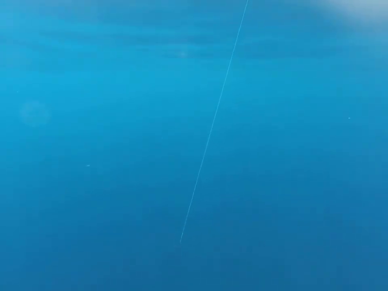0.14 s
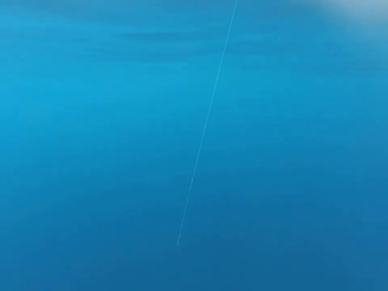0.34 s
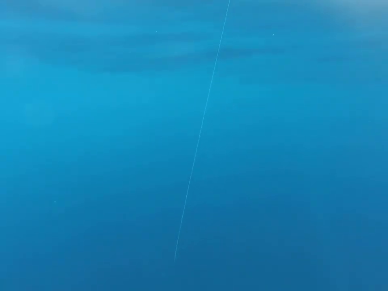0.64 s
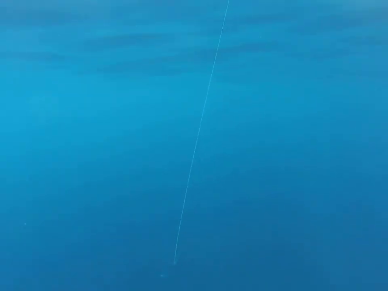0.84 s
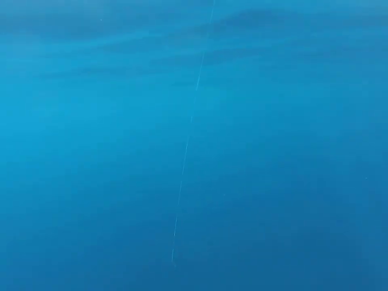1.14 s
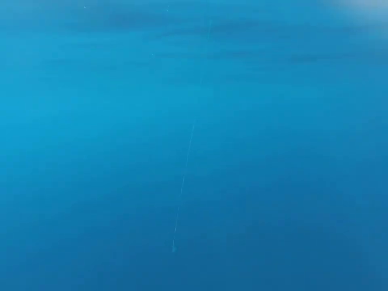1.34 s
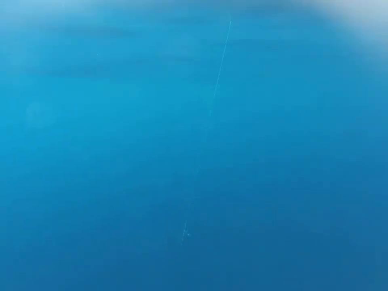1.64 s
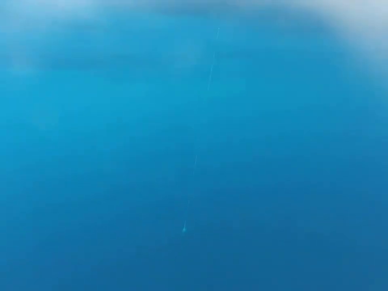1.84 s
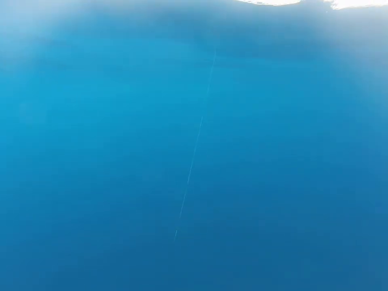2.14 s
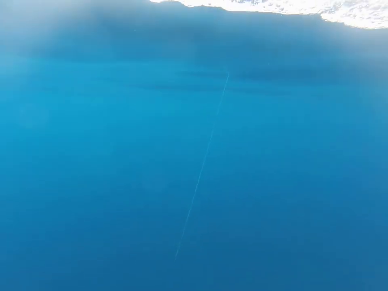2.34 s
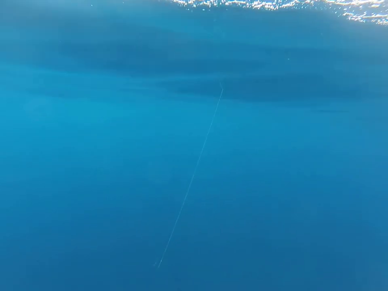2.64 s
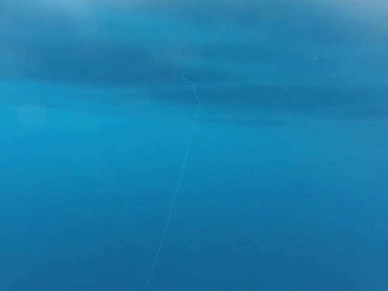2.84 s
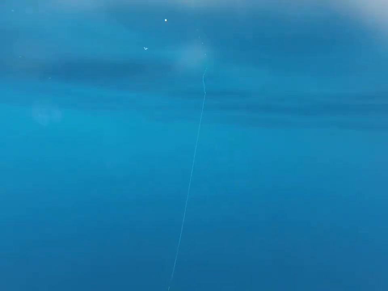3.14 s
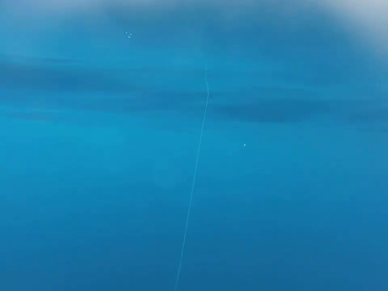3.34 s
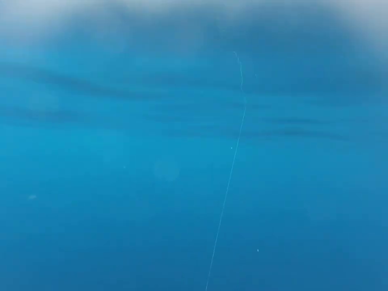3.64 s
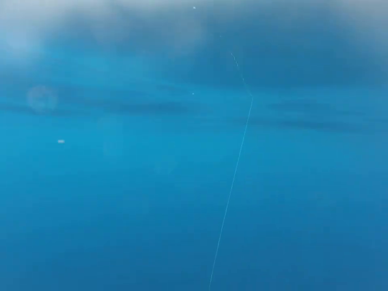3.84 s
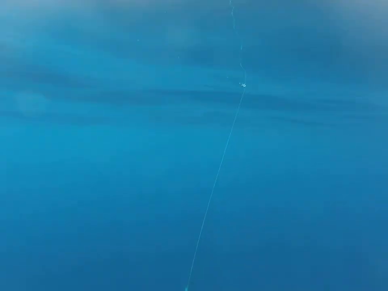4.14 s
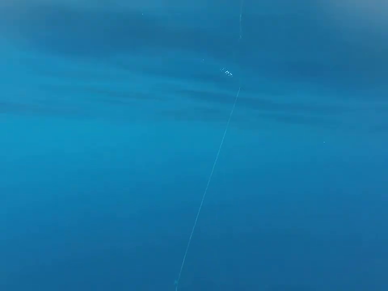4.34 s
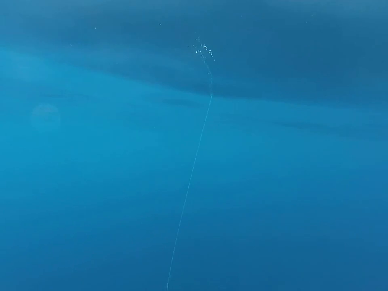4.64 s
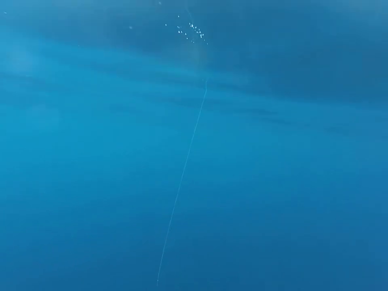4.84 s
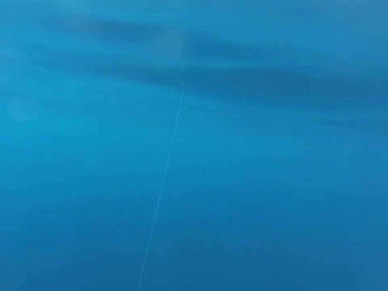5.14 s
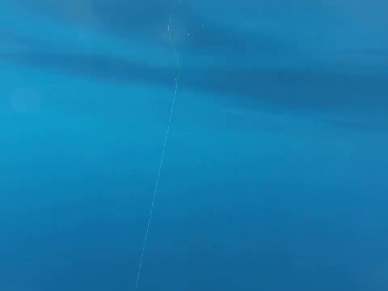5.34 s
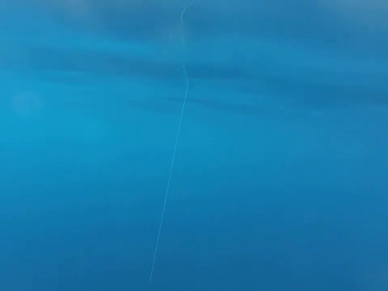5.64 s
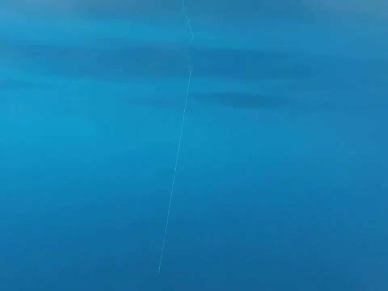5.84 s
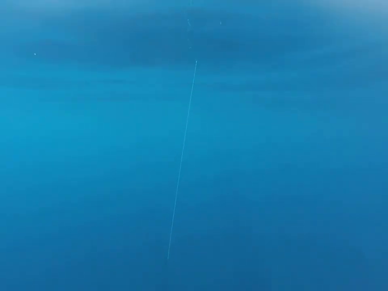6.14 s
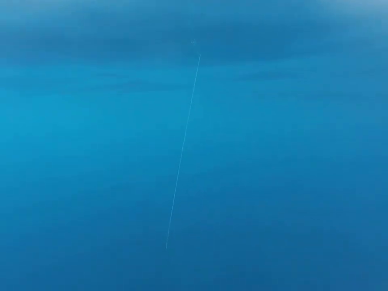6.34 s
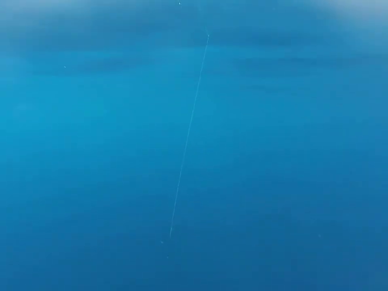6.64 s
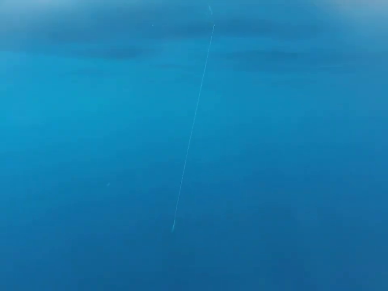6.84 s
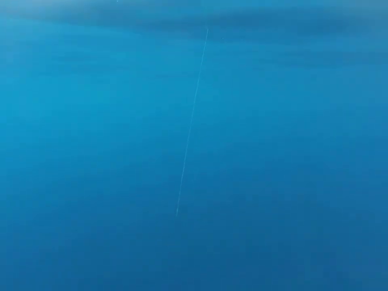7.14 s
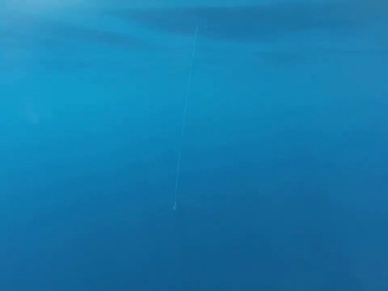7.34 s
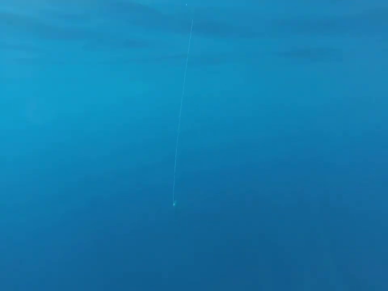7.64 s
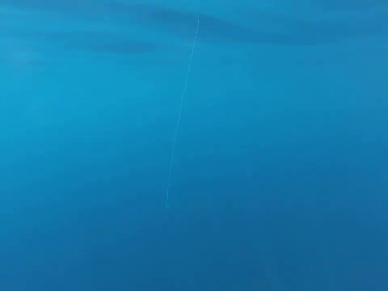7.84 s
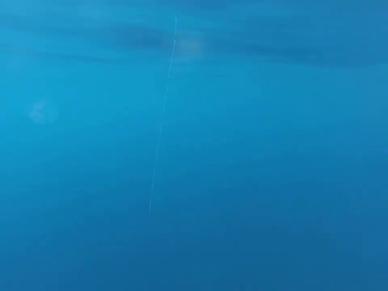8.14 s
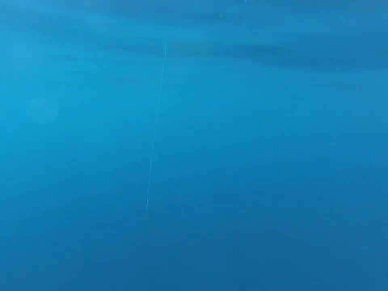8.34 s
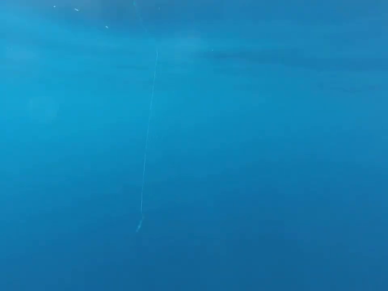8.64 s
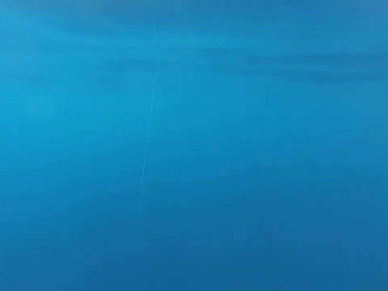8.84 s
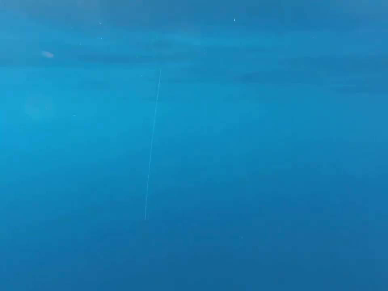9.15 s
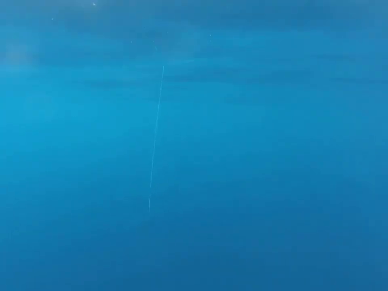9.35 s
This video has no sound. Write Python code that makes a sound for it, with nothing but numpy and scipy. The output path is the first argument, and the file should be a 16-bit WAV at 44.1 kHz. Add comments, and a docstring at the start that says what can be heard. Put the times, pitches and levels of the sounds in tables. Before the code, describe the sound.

Just under the sea, a quiet boat-hull hum and fast ticking give way at two seconds to a harsh, bubbling propeller roar.

```python
"""A hull drones and an engine knocks twelve times a second, heard in a waterproof housing just under the sea.
Shaken resonances and a singing tone make the drone; flow noise, decaying pulsations and struck modes make
the water that buffets and taps the housing. At two seconds the propeller wash arrives: random clicks,
as of collapsing bubbles, make the housing whine, crackle and fizz, and the recorder's limiter pumps.
Late on, a plume of bubbles gurgles and chirps past."""
import sys
import numpy as np
from scipy import signal
from scipy.fft import rfft, irfft
from scipy.io import wavfile

SR = 44100
rng = np.random.default_rng(int(sys.argv[2]) if len(sys.argv) > 2 else 0)


def materialize(psi):
    """Save the field psi as 16-bit PCM at rate SR to the path in sys.argv[1].

    A 1-D psi becomes a single channel; in a 2-D psi each row is a channel.
    """
    bounded = np.clip(np.atleast_2d(psi).T, -1, 1)
    quanta = np.round(bounded * 32767).astype(np.int16)
    wavfile.write(sys.argv[1], SR, quanta)


N = 418509
TIME = np.arange(N) / SR
FFT_SIZE = 16384
FREQS = np.arange(FFT_SIZE // 2 + 1) * SR / FFT_SIZE

ENGINE_HZ = 12.08  # engine cycles per second
WASH_START_S, WASH_RISE_S = 1.968, 0.033
# spectrum of fluttering water: (frequency [Hz], relative level [dB])
FLUTTER_SPECTRUM = [(35, -18.5), (55, -7), (75, 0.5), (100, -0.5), (150, -4), (230, -12.5), (500, -40.5)]


def from_db(db):
    """Amplitude ratio of a level: 20 dB is a factor of ten."""
    return 10 ** (np.asarray(db) / 20)


def rms_one(x):
    """Normalization by the root mean square, the measure of a signal's power."""
    return x / np.sqrt(np.mean(x ** 2) + 1e-20)


def in_time(rows):
    """Linear interpolation of each column of a table whose first column is time [s]."""
    s, *columns = np.transpose(rows)
    return [np.interp(TIME, s, c) for c in columns]


def drift(rate):
    """Low-passed noise: white noise through a double pole at rate [Hz] wanders smoothly, with rms 1."""
    step = 20  # computed at every 20th sample
    settling = 2000
    pole = np.exp(-2 * np.pi * rate * step / SR)
    noise = rng.standard_normal(N // step + 2 + settling)
    slow = signal.lfilter([1], [1, -2 * pole, pole * pole], noise)[settling:]
    return np.interp(np.arange(N) / step, np.arange(len(slow)), rms_one(slow))


def swell(s, length_s):
    """Raised-cosine envelope: a smooth rise to 1 at time s and back, length_s wide at half height."""
    return np.cos(np.pi / 2 * np.clip((TIME - s) / length_s, -1, 1)) ** 2


def response(gain):
    """Minimum phase: folding the cepstrum of a gain at FREQS yields its causal impulse response."""
    cepstrum = irfft(np.log(gain + 1e-7))
    cepstrum[1:FFT_SIZE // 2] *= 2
    cepstrum[FFT_SIZE // 2 + 1:] = 0
    return irfft(np.exp(rfft(cepstrum)))[:FFT_SIZE // 2]


def body(modes):
    """Modal superposition: the powers of steep-sided resonances add up to one impulse response."""
    power = 0
    for hz, width, db in modes:
        detuning = (FREQS - hz) / width
        power = power + from_db(db) ** 2 / (1 + detuning ** 2 / 2) ** 6
    return response(np.sqrt(power))


def colour(points):
    """Spectral shaping: a smooth response through the points that falls away towards and above the last."""
    hz, db = np.transpose(points)
    gain = from_db(np.interp(np.log(FREQS + 1), np.log(hz), db))
    return response(gain / (1 + (FREQS / hz[-1]) ** 2))


def excite(force, impulse):
    """Linear response: convolving a steady force with an impulse response, scaled to rms 1."""
    return rms_one(signal.oaconvolve(force, impulse)[:N])


def add(out, s, sound):
    """Superposition: a short sound adds to the others from time s."""
    start = max(round(s * SR), 0)
    out[start:start + len(sound)] += sound[:max(N - start, 0)]


def strikes(events, impulse, rattle, contact_s):
    """Impulse excitation: a click and a decaying rattle ring a body, peaking at the event's time and level."""
    out, t = np.zeros(N), TIME[:FFT_SIZE // 8]
    for s, db in events:
        force = rng.standard_normal(len(t)) * np.exp(-t / contact_s)
        force *= rattle / np.linalg.norm(force)
        force[0] += 1  # the click
        sound = signal.fftconvolve(force, impulse)
        size = np.abs(sound)
        add(out, s - np.argmax(size) / SR, from_db(db) * sound / size.max())
    return out


def random_clicks(per_s, size_db):
    """Shot noise: independent clicks of either sign and uneven size at random moments."""
    sizes = from_db(size_db * np.minimum(rng.exponential(1, N), 4))
    signs = rng.choice([-1, 1], N)
    return sizes * signs * (rng.random(N) < per_s / SR)


def throb(depth_db):
    """Amplitude modulation at the engine rate and its next three harmonics, each depth_db deep."""
    cycles = ENGINE_HZ * TIME + 0.2 * drift(0.33)
    return from_db(depth_db * sum(np.cos(2 * np.pi * (k * cycles + rng.random())) for k in range(1, 5)))


def pulsation(db, hz, cycles, rise):
    """Volume oscillation of a pocket of air or water: a gliding sine that falls 60 dB in the given cycles."""
    age = TIME[:SR // 3] * hz / cycles  # 1 when 60 dB down
    onset = 1 - np.exp(-age / 0.085)
    phase = 2 * np.pi * cycles * (age + rise * age ** 2)
    swing = np.sin(phase) * onset * from_db(-60 * age)
    return from_db(db) * swing / np.abs(swing).max()


def hull_drone(in_wash):
    """Forced resonance: engine shaking rings the hull beside a singing tone, until the wash covers both."""
    # level of the drone: (time [s], main resonances [dB], overtones [dB])
    drone_levels = [(0.0, -23.5, -38), (0.25, -29, -39.5), (0.45, -26, -34.5), (1.0, -21.5, -39.5),
                    (1.3, -22, -35), (1.95, -25, -38.5)]
    # singing tone: (time [s], frequency [Hz], share of the main power [0-1])
    singing = [(0, 606.5, 0.18), (.5, 602, 0.06), (.8, 599, 0.38), (1.1, 605, 0.46), (1.4, 602.5, 0.39),
               (1.95, 588.7, 0.62)]
    # main hull resonances: (frequency [Hz], width [Hz], relative level [dB])
    hull_modes = [(180, 184, -14), (460, 88, -13.5), (593, 59, -3), (615, 286, -16), (828, 140, -28),
                  (906, 40, -15)]
    # overtones of the hull: (frequency [Hz], width [Hz], relative level [dB])
    overtone_modes = [(1273, 96, -3), (1348, 49, 5), (1600, 101, -12), (1800, 150, -12), (2180, 240, -15),
                      (2530, 200, -22.5), (3247, 650, -33.5), (3867, 610, -42)]
    main_db, overtone_db = in_time(drone_levels)
    hz, share = in_time(singing)
    share = np.clip(share, 0, 1)
    shake = random_clicks(per_s=1400, size_db=3.5) * throb(depth_db=0.94)
    phase = 2 * np.pi * np.cumsum(hz + 5 * drift(15.4)) / SR
    tone = np.sqrt(2) * np.sin(phase) * from_db(1.7 * drift(15))
    main = np.sqrt(share) * tone + np.sqrt(1 - share) * excite(shake, body(hull_modes))
    overtones = excite(shake, body(overtone_modes))
    return (1 - in_wash) * (from_db(main_db) * main + from_db(overtone_db) * overtones)


def flow():
    """Turbulent pressure: eddies rumble and flutter on the housing, their power rising in each surge."""
    # spectrum of the rumble: (frequency [Hz], relative level [dB])
    rumble_spectrum = [(8, -2), (20, 1.5), (33, -2.5), (52, -0.5), (75, -16), (150, -43.5)]
    # surges of water: (time of peak [s], length [s], rumble [dB], flutter [dB])
    surges = [(0.25, 0.38, -28, -31), (0.883, 0.15, -21, -47), (1.15, 0.24, -24, -24.5),
              (1.55, 0.39, -22.5, -19.5), (1.93, 0.25, -18, -22.5), (2.397, 0.24, -18.5, -34),
              (4.25, 0.36, -39, -32), (5.3, 0.32, -30, -31.5), (6.58, 0.24, -29, -29),
              (7.2, 0.52, -50, -30), (7.72, 0.18, -30, -37), (8.42, 0.55, -19.5, -30.5)]
    rumble_power, flutter_power = from_db(-31) ** 2, from_db(-47) ** 2  # steady flow
    for s, length, rumble_db, flutter_db in surges:
        surge = swell(s, length)
        rumble_power = rumble_power + surge * from_db(rumble_db) ** 2
        flutter_power = flutter_power + surge * from_db(flutter_db) ** 2
    rumble = np.sqrt(rumble_power) * excite(rng.standard_normal(N), colour(rumble_spectrum))
    eddies = random_clicks(per_s=150, size_db=2.5)
    flutter = np.sqrt(flutter_power) * excite(eddies, colour(FLUTTER_SPECTRUM))
    return rumble + flutter


def hiss():
    """Broadband noise: a faint steady random signal with a sloping spectrum."""
    # spectrum of the hiss: (frequency [Hz], relative level [dB])
    hiss_spectrum = [(500, -0.5), (4000, -1), (7000, -3.5), (10000, -6), (15000, -6)]
    return from_db(-63) * excite(rng.standard_normal(N), colour(hiss_spectrum))


def knocks():
    """Impact excitation once per engine cycle until the wash; each knock weights the modes afresh."""
    # what a knock rings with: (frequency [Hz], width [Hz], mean relative level [dB])
    knock_modes = [(1430, 90, 4.5), (1640, 130, -0.5), (1870, 240, -0.5), (2142, 100, 3.5), (2430, 100, -4),
                   (2522, 83, 3.5), (3300, 230, -15), (3930, 300, -19)]
    first_s, jitter_s = 0.04, 0.0015
    level_db, spread_db = -28, 4
    out = np.zeros(N)
    for s in np.arange(first_s, WASH_START_S, 1 / ENGINE_HZ):
        late, force, *luck = rng.standard_normal(len(knock_modes) + 2)
        modes = [(hz, width, db + 3.3 * z) for (hz, width, db), z in zip(knock_modes, luck)]
        knock = (s + jitter_s * late, level_db + spread_db * force)
        out += strikes([knock], body(modes), rattle=2.6, contact_s=0.0048)
    return out


def pops():
    """Bubble resonance: tiny bubbles pop at random, the smaller ones higher and fainter."""
    out = np.zeros(N)
    for when, octaves, luck in rng.random((110, 3)) * [TIME[-1], 2, 1]:
        db = -35 - 14 * octaves - 13 * luck
        add(out, when, pulsation(db, hz=1700 * 2 ** octaves, cycles=56, rise=0.03))
    return out


def passing_bubbles():
    """Bubble resonance: single bubbles close by pulsate and die away, rising a little in pitch."""
    # bubbles: (start time [s], peak level [dB], initial frequency [Hz], cycles to fall 60 dB)
    bubbles = [(.22, -44, 5700, 60), (.362, -33, 1760, 98), (8.27, -22, 2200, 70), (8.272, -31, 4040, 82),
               (8.291, -11, 417, 30), (8.308, -32, 4030, 110), (8.345, -19, 374, 32),
               (8.372, -14, 2160, 110), (8.378, -34, 3900, 110), (8.403, -10, 390, 18),
               (8.501, -14.5, 320, 19), (8.563, -9, 304, 11), (8.612, -6.5, 477, 44),
               (8.675, -4.5, 242, 4.9), (8.911, -15, 327, 11), (9.164, -13, 394, 14),
               (9.262, -13, 262, 2.7)]
    out = np.zeros(N)
    for s, db, hz, cycles in bubbles:
        add(out, s, pulsation(db, hz, cycles, rise=0.026))
    return out


def buffets():
    """Heavily damped oscillation: water thuds on the housing for about two cycles, sinking in pitch."""
    # buffets: (start time [s], peak level [dB], initial frequency [Hz])
    thuds = [(0.281, -14, 42), (1.002, -5.5, 78.8), (1.092, -7.5, 65), (1.163, -7.5, 130), (1.436, -11, 55),
             (1.486, 11.5, 71), (1.571, 3.5, 111), (1.672, -10, 101), (1.748, 1, 60), (1.804, -9, 80),
             (1.944, 7.5, 55), (2.191, -10, 79.5), (2.396, -8, 111), (2.454, -10, 70), (4.69, -8, 28)]
    out = np.zeros(N)
    for s, db, hz in thuds:
        add(out, s, pulsation(db, hz, cycles=2.1, rise=-0.046))
    return out


def taps():
    """Impact excitation: taps on the housing ring its broad, quickly damped modes."""
    # taps: (time of peak [s], peak level [dB])
    tap_events = [(1.299, -13), (1.352, -6), (1.421, -7), (1.488, -7), (1.664, -6)]
    # what a tap rings with: (frequency [Hz], width [Hz], relative level [dB])
    tap_modes = [(332, 140, 8.5), (620, 130, 3), (910, 240, 2.5), (1320, 120, 5), (1740, 280, -5),
                 (2400, 200, -28)]
    return strikes(tap_events, body(tap_modes), rattle=0.65, contact_s=0.0031)


def overload_clicks():
    """Impulse spectrum: brief bright broadband clicks, as when the strongest thuds overdrive the recorder."""
    # overload clicks: (time of peak [s], peak level [dB])
    click_events = [(1.362, -35), (1.422, -34), (1.489, -12), (1.751, -22.5), (1.81, -38), (1.948, -17)]
    # spectrum of a click: (frequency [Hz], relative level [dB])
    click_spectrum = [(1500, -16), (3000, -5), (5500, -3), (9000, -5), (15000, -12)]
    return strikes(click_events, colour(click_spectrum), rattle=1.0, contact_s=0.0006)


def hum():
    """Frequency modulation: a low sine wavers slightly in pitch as it swells and fades."""
    # swells of the hum: (time of peak [s], length [s], rms level at the peak [dB])
    hum_swells = [(2.3, 0.41, -27), (2.78, 0.25, -29), (3.28, 0.13, -24), (4.3, 0.093, -28.5)]
    gain = sum(from_db(db) * swell(s, length) for s, length, db in hum_swells)
    phase = 2 * np.pi * np.cumsum(71.7 + 0.92 * drift(2.3)) / SR
    return gain * np.sqrt(2) * np.sin(phase)


def fine_bubbles(force, modes):
    """Selective resonance: each high mode brightens while a bubble cloud near its pitch drifts past."""
    # clouds: (time of peak [s], length [s], greatest lift [dB], centre frequency [Hz])
    fine_clouds = [(2.85, 0.75, 6, 6500), (3.5, 0.63, 3, 3460), (4.297, 0.79, 8.5, 6700),
                   (4.498, 0.4, 5, 12400), (5.273, 0.26, 5.5, 5240), (5.27, 0.4, 0, 13400),
                   (5.45, 0.98, 3.5, 3550), (8.48, 0.36, 2, 5340)]
    spread_octaves = 0.28  # bubble pitches in a cloud
    lifts = [(db * swell(s, length), hz) for s, length, db, hz in fine_clouds]
    shares = np.array([from_db(db) ** 2 * width for _, width, db in modes])
    out = np.zeros(N)
    for mode, share in zip(modes, shares / shares.sum()):
        lift_db = 0
        for db, hz in lifts:
            distance = np.log2(mode[0] / hz) / spread_octaves
            lift_db = lift_db + db * np.exp(-distance ** 2)
        out += np.sqrt(share) * from_db(lift_db) * excite(force, body([mode]))
    return out


def propeller(in_wash):
    """Cavitation: clouds of collapsing bubbles, throbbing at the engine rate, ring the housing."""
    # strength of the wash before its rush of arrival: (time [s], level [dB])
    wash_strength = [(2.04, -4.5), (2.17, -5), (2.35, 1.5), (2.6, -1), (3.6, 0), (4.4, 2), (5.45, 0.5),
                     (5.75, -1), (6.0, 4), (6.25, 0.5), (6.6, 1), (7.05, 0.2), (7.6, -1), (8.0, 1),
                     (8.16, -4.5), (8.45, 0.5), (8.77, -2.5), (9.49, -0.5)]
    # churning water at wash strength 0 dB: (time [s], level [dB])
    churn_levels = [(2.15, -37), (2.4, -27), (2.6, -30), (3.0, -26.5), (4.5, -26), (5.2, -29), (6.3, -26),
                    (7.25, -19), (8.0, -25.5), (8.2, -32.5), (9.49, -28.5)]
    # spectrum of churning water: (frequency [Hz], relative level [dB])
    churn_spectrum = [(50, -22), (100, -12), (160, 1), (220, 1), (300, 1), (400, 1), (520, -13),
                      (800, -56.5)]
    # housing resonances, from low to high: (frequency [Hz], width [Hz], relative level [dB])
    whine_modes = [(441, 142, -13), (532.6, 62, -5), (601, 64.5, 0.5), (678, 167, -13.5), (810, 43, -21),
                   (906, 106, -19)]
    crackle_modes = [(1284, 150, -1), (1660, 200, -7.5), (1790, 205, 0.0), (2087, 160, -5.5),
                     (2360, 99, -10.5), (2443, 210, -10.5)]
    spray_modes = [(3237, 306, -14), (3834, 202, -18), (4060, 736, -19)]
    fizz_modes = [(5500, 420, 0), (6805, 620, -1), (7576, 570, -4), (9030, 840, -15.6), (10300, 580, -7),
                  (10870, 380, -7)]
    sizzle_modes = [(11760, 500, -3), (12900, 800, -1), (14900, 2882, -4.5)]

    rush_db = 16 * swell(2.005, length_s=0.052)  # the wash arrives with a rush
    wash_db = in_time(wash_strength)[0] + rush_db
    churn_db = in_time(churn_levels)[0] + wash_db
    clouds = throb(depth_db=0.37) * from_db(1.54 * drift(40))
    coarse = random_clicks(per_s=14000, size_db=3.0) * clouds
    fine = random_clicks(per_s=10000, size_db=3.5) * clouds

    # whine, fizz and sizzle follow only a share of the wash's swing in dB
    whine = from_db(-15.5 + 0.82 * wash_db) * excite(coarse, body(whine_modes))
    crackle = from_db(-28 + wash_db) * excite(coarse, body(crackle_modes))
    spray = from_db(-41.5 + wash_db) * fine_bubbles(coarse, spray_modes)
    fizz = from_db(-47.5 + 0.84 * wash_db) * fine_bubbles(fine, fizz_modes)
    sizzle = from_db(-61.5 + 0.84 * wash_db) * fine_bubbles(fine, sizzle_modes)
    churning = random_clicks(per_s=1500, size_db=2.5) * clouds
    churn = from_db(churn_db) * excite(churning, colour(churn_spectrum))
    flutter = from_db(churn_db - 14.5) * excite(rng.standard_normal(N), colour(FLUTTER_SPECTRUM))
    return in_wash * (whine + crackle + spray + fizz + sizzle + churn + flutter)


def small_bursts():
    """Jittered periodicity: lesser collapses, equal in level, scatter about even spacing in the wash."""
    gap_s, peak_db = 0.24, -7
    count = 80
    s = WASH_START_S + gap_s * (np.arange(count) + 2 + rng.standard_normal(count) / 2)
    return [(when, peak_db) for when in s if when < TIME[-1]]


def bursts():
    """Impulsive collapse: whole bubble clouds give way at once and strike the housing's modes."""
    # loudest collapses: (time of peak [s], peak level [dB])
    large_bursts = [(2.007, 2), (2.055, 0), (2.472, -5), (2.541, -0.5), (2.781, -0.5), (2.897, -7),
                    (3.135, -7.5), (3.351, -3), (3.481, -1.5), (3.679, 1.5), (4.357, 1), (4.657, 1.5),
                    (4.891, -2.5), (5.004, 2), (5.985, -2.5), (6.104, -5), (6.142, -2), (6.461, 1),
                    (7.289, -3), (7.446, -3), (7.55, 3), (7.843, -3), (8.101, -1), (8.206, -0.5),
                    (8.239, -3.5), (8.442, -6), (8.618, -0.5), (8.734, 1), (8.777, 2.5), (8.826, -1),
                    (8.919, -2), (8.981, 1), (9.04, -2), (9.078, -1), (9.17, -1), (9.229, -5), (9.274, -4),
                    (9.304, 3), (9.37, -1.5), (9.453, -4.5)]
    # what a collapse rings with: (frequency [Hz], width [Hz], relative level [dB])
    burst_modes = [(594, 86, 2), (507.4, 120, -12.5), (685, 100, -16.5), (1273.3, 110, -27),
                   (1855, 160, -24)]
    return strikes(large_bursts + small_bursts(), body(burst_modes), rattle=0.4, contact_s=0.0061)


def faint_clicks():
    """Impulse spectrum: two faint, very brief clicks, strongest in the high treble."""
    # faint clicks: (time of peak [s], peak level [dB])
    click_events = [(5.007, -34), (5.42, -26)]
    # spectrum of a faint click: (frequency [Hz], relative level [dB])
    click_spectrum = [(6000, -30), (9000, -6), (11000, -3), (15000, 0)]
    return strikes(click_events, colour(click_spectrum), rattle=1.0, contact_s=0.0008)


def plume():
    """Bubble resonance: in a rising plume large bubbles gurgle low and small ones chirp high."""
    centre_s, length_s = 8.43, 0.45
    out = np.zeros(N)
    for when, octaves, weak in rng.random((10, 3)) - [0.5, 0.5, 0]:
        gurgle = pulsation(-17 - 8 * weak, hz=370 * 2 ** octaves, cycles=16, rise=0.2)
        add(out, centre_s + length_s * when, gurgle)
    for when, octaves, weak in rng.random((40, 3)) - [0.5, 0.5, 0]:
        chirp = pulsation(-29 - 10 * weak, hz=2500 * 2 ** (1.4 * octaves), cycles=35, rise=0.04)
        add(out, centre_s + length_s * when, chirp)
    return out


def scene():
    """Superposition: engine, water, propeller wash and clicks add at one point."""
    in_wash = np.clip((TIME - WASH_START_S) / WASH_RISE_S, 0, 1)
    engine = hull_drone(in_wash) + knocks()
    water = flow() + hum() + pops() + passing_bubbles() + buffets() + taps()
    wash = propeller(in_wash) + bursts()
    clicks = overload_clicks() + faint_clicks()
    return (engine + water + wash + plume() + clicks + hiss())[None]


def limiter(x, threshold_db, release_db_per_s, attack_s):
    """Gain reduction: peaks over the threshold soon pull the gain down; it creeps back at a steady rate."""
    over = np.maximum(20 * np.log10(np.abs(x) + 1e-9) - threshold_db, 0)
    recovery = release_db_per_s * TIME
    held = np.maximum.accumulate(over + recovery, axis=-1) - recovery
    r = np.exp(-1 / (attack_s * SR))
    return x * from_db(-signal.lfilter([1 - r], [1, -r], held))


def record(dry):
    """Band limiting and compression: a low cut, a fast limiter, clipping at full scale, a steep top cut."""
    low_cut = signal.butter(1, 12, "high", fs=SR, output="sos")
    heard = signal.sosfilt(low_cut, dry)
    limited = limiter(heard, threshold_db=-5.0, release_db_per_s=101, attack_s=0.0006)
    top_cut = signal.ellip(10, 0.1, 80, 15250, fs=SR, output="sos")
    return signal.sosfilt(top_cut, np.clip(limited, -1, 1))


dry = scene()
out = record(dry)
materialize(out)
```